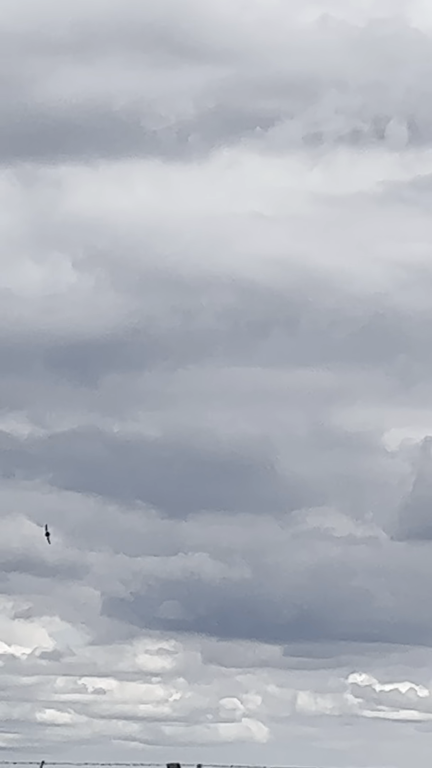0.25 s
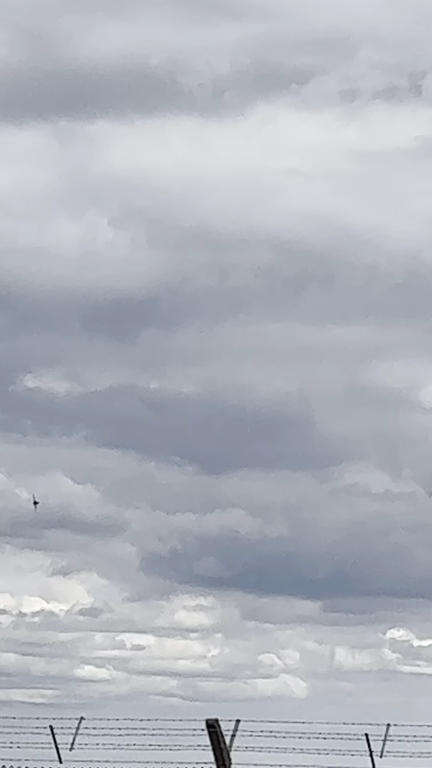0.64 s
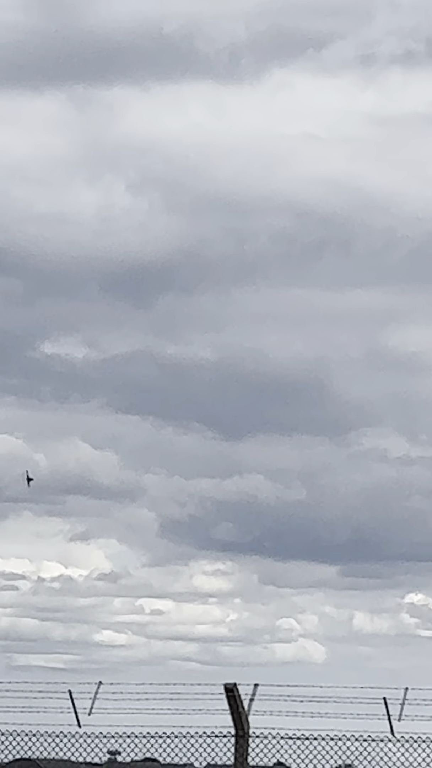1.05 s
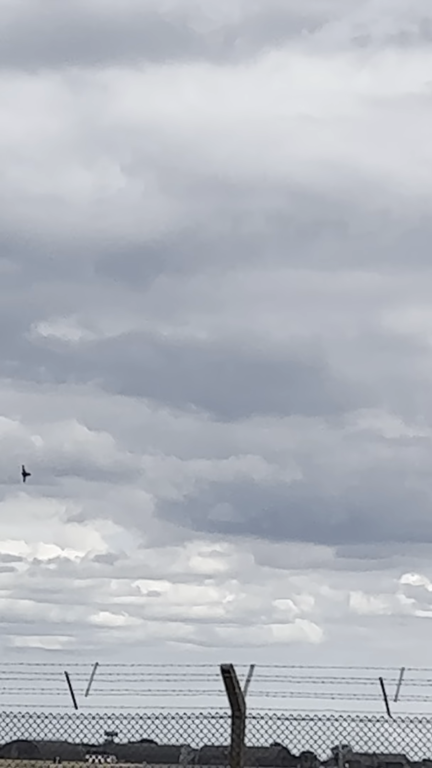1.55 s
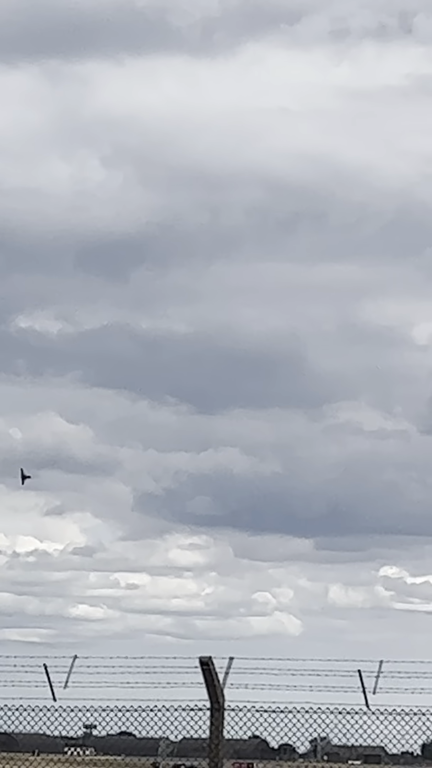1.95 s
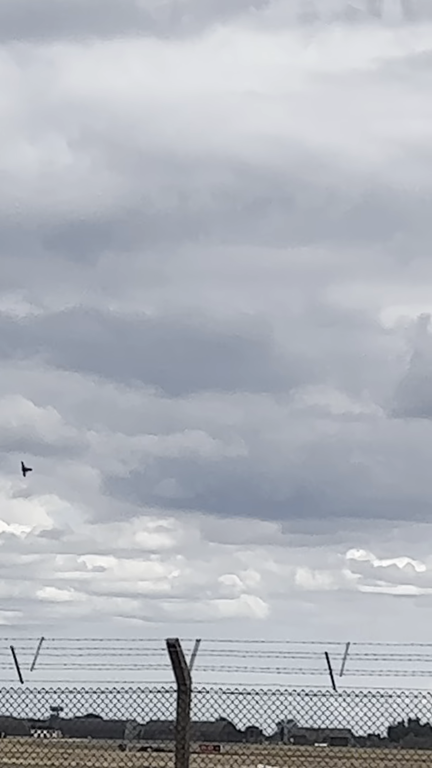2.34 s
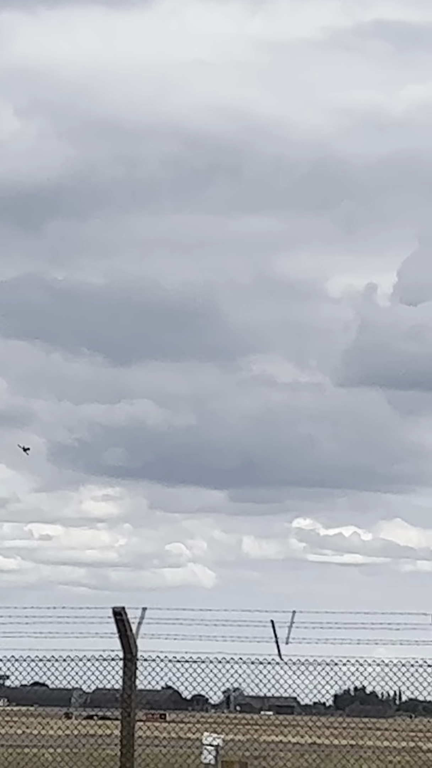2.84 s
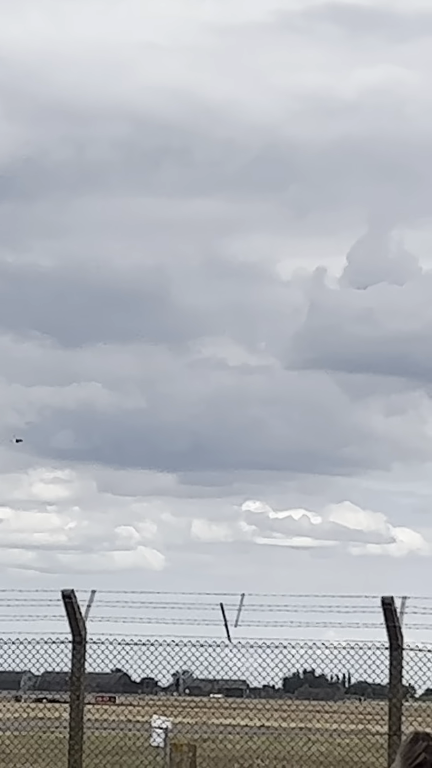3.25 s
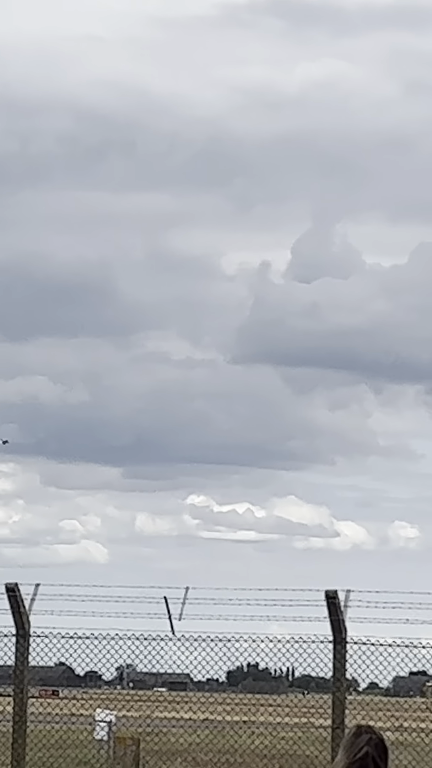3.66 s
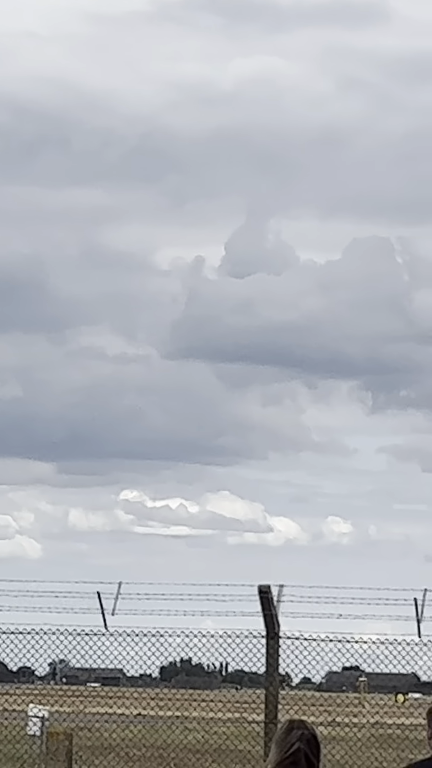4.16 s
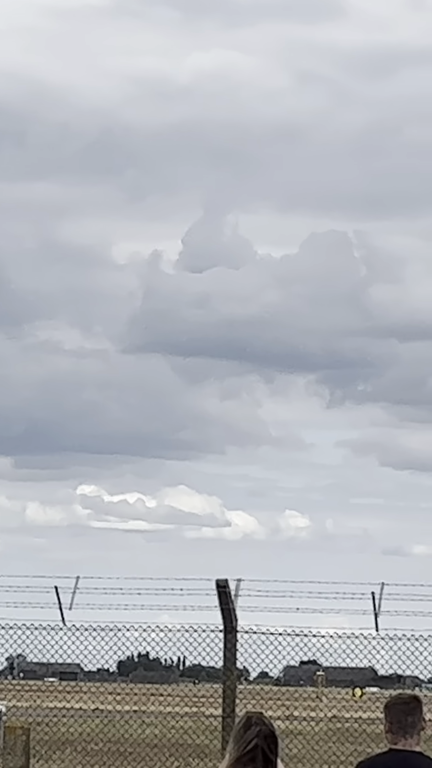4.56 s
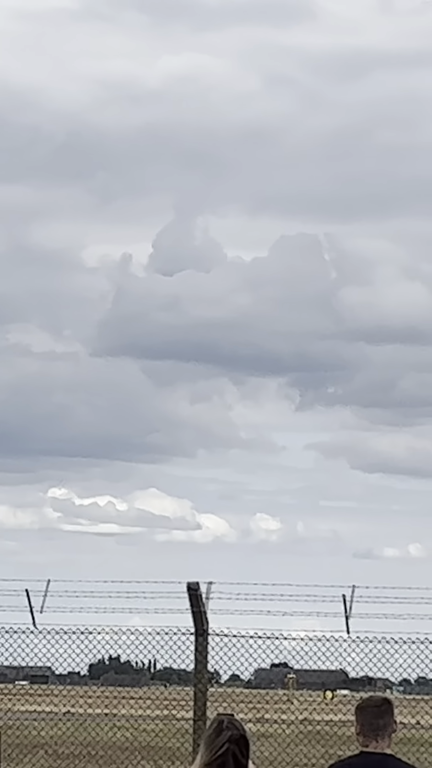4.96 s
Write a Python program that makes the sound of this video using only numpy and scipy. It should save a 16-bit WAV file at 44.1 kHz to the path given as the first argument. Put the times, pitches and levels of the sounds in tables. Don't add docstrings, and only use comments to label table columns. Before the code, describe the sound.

Outdoor hand-held stereo pickup of a receding fighter jet: a deep churning exhaust rumble flickering in tone and loudness, with small crackles near one second and a dense volley of snaps after three. The roar then darkens and sinks into the distance as low rumbling pushes, wind puffs against the microphone and a faint late rustle of grass remain.

```python
import sys
import numpy as np
from scipy import signal
from scipy.fft import rfft, irfft, next_fast_len
from scipy.io import wavfile
from scipy.ndimage import uniform_filter1d, minimum_filter1d

SR = 44100
rng = np.random.default_rng(int(sys.argv[2]) if len(sys.argv) > 2 else 0)


def attenuation_scalar(level_db):
    decades = np.asarray(level_db, float) / 20
    return 10 ** decades


def to_wav(s):
    ch = np.atleast_2d(s).T
    pcm = np.round(np.clip(ch, -1, 1) * 32767)
    wavfile.write(sys.argv[1], SR, pcm.astype(np.int16))


N = 229529
PADDED = next_fast_len(N + SR // 4)
BLOCK = 40


def rms_one(x):
    return x / np.sqrt(np.mean(x ** 2) + 1e-20)


def in_time(rows):
    t_s, *columns = np.transpose(rows)
    return np.array([np.interp(np.arange(N) / SR, t_s, c) for c in columns])


def at_hz(points, column=1):
    hz = np.arange(PADDED // 2 + 1) * SR / PADDED + 1
    table = np.array(points)
    return np.interp(np.log(hz), np.log(table[:, 0]), table[:, column])


def colour(x, spectrum):
    return irfft(rfft(x, PADDED) * attenuation_scalar(at_hz(spectrum)), PADDED)[..., :N]


def impulses(events, gain_db, floor):
    clicks = np.full(N, floor)
    clicks[[round(t_s * SR) for t_s, db in events]] = attenuation_scalar(np.array(events)[:, 1] + gain_db)
    return clicks


def filled(coarse):
    return np.interp(np.arange(N) / BLOCK, np.arange(len(coarse)), coarse)


def drift(rate):
    r = np.exp(-2 * np.pi * BLOCK * rate / SR)
    noise = rng.standard_normal(N // BLOCK + 2002)
    slow = signal.lfilter([1], [1, -2 * r, r * r], noise)[2000:]
    return filled(rms_one(slow))


def bumps(t_s, half_s):
    block_s = np.arange(0, N + BLOCK, BLOCK) / SR
    return np.exp(-((block_s - np.array(t_s)[:, None]) / np.array(half_s)[:, None]) ** 2)


def lifts(rows):
    t_s, half_s, db = np.transpose(rows)
    return filled(db @ bumps(t_s, half_s))


# t/s, level/dB, brightness/(dB/octave)
PASS = [(0.0, 10.5, 1.4), (0.15, 0.5, 2.5), (0.55, 0.4, 2), (1.0, 6.5, 0.4), (1.5, 3, 1), (2.0, -3.5, 0.5),
        (2.4, 1, 0.25), (2.9, 1.5, 0), (3.3, 6, 0.37), (3.55, 4.5, 0), (3.95, -1.6, -2), (4.3, -3.5, -1.03),
        (4.8, -8.5, -1.5), (5.2, -24, 2.5)]
PIVOT_HZ = 300
# t/s, half length/s, f/Hz, lift/dB
WIDE_SWELLS = [(0.042, 0.03, 700, 0), (0.092, 0.081, 65, 4.4), (0.642, 0.023, 2402, 4.3),
               (0.666, 0.029, 119, 5.2), (0.903, 0.1, 303, 9.5), (0.973, 0.017, 2440, 5),
               (1.242, 0.037, 1067, 7), (1.45, 0.027, 87.1, 6.2), (1.452, 0.059, 983, 5.6),
               (1.834, 0.052, 882, 8.3), (2.016, 0.05, 1316, 8.7), (2.06, 0.019, 262, 5),
               (2.434, 0.037, 563, 10), (2.609, 0.085, 769, 13.5), (2.766, 0.021, 1442, 11),
               (2.785, 0.062, 524, 10.4), (3.239, 0.015, 2506, 5.5), (3.461, 0.13, 350, 7.1),
               (3.475, 0.13, 2955, 5.3), (3.877, 0.19, 2930, 4.4), (4.281, 0.026, 600, 3.9),
               (4.638, 0.036, 536, 6.2), (4.988, 0.044, 229, 9.7), (5.144, 0.19, 62, 27)]
# t/s, half length/s, f/Hz, lift/dB
NARROW_SWELLS = [(0.081, 0.58, 2080, 5), (0.114, 0.092, 334.4, 4.4), (0.25, 0.045, 606, 8),
                 (0.413, 0.091, 458, 6), (0.783, 0.037, 543, 6.7), (0.892, 0.21, 2430, 9.3),
                 (1.123, 0.056, 910, 3.7), (1.281, 0.14, 328, 11.2), (1.362, 0.078, 2104, 4),
                 (1.506, 0.053, 390, 9.9), (1.796, 0.42, 1760, 3), (1.914, 0.09, 320.4, 13),
                 (1.958, 0.23, 130, 12), (2.207, 0.037, 1041, 11), (2.571, 0.017, 100.5, 7.7),
                 (2.641, 0.027, 1550, 5.6), (2.643, 0.094, 264, 2.7), (2.747, 0.065, 174.3, 8),
                 (3.0, 0.13, 164, 8.4), (3.013, 0.14, 334.3, 14), (3.255, 0.052, 166, 9),
                 (3.264, 0.047, 297, 15), (3.319, 0.24, 97.6, 7.4), (3.659, 0.035, 132, 7.1)]
# t/s, half length/s, f/Hz, lift/dB
SMALL_SWELLS = [(.91, 0.035, 230, 2.5), (2.3, 0.16, 460, 6), (9.4, .04, 80, 1.5), (3.25, 0.012, 92, 2.5),
                (.975, .02, 1700, -3), (5.5, 0.046, 330, 5.5), (2.5, .06, 81, 5), (2.3, 0.021, 610, 3.5),
                (2.7, 0.036, 300, -1.5), (.55, 0.062, 240, 3), (1.6, 0.02, 930, 0), (0.75, 0.031, 480, 8),
                (1.24, 0.035, 340, 3), (1.8, 0.038, 830, -3), (1.53, .04, 580, 0), (1.4, 0.018, 3300, 3.5),
                (1.8, .015, 290, -9), (2, 0.012, 500, -3.5), (1.5, 0.028, 1500, 1.5), (4.1, .03, 750, -1),
                (5.7, 0.028, 1100, 7.5), (0.63, .06, 290, -3.5), (3.4, 0.034, 170, 1), (3.0, 0.012, 250, 6),
                (3.27, 0.017, 300, 3.5), (4, 0.065, 290, -1), (3.45, .05, 190, -5), (3.5, 0.013, 600, 3),
                (1.9, 0.034, 780, 0), (5.7, .012, 3300, -6), (2.1, 0.018, 250, 10), (3.5, .02, 880, -1),
                (0.054, 0.054, 2200, -0.5), (.025, 0.022, 370, 1.5), (3.48, .03, 4800, 4),
                (3.555, 0.0099, 2600, 0.5), (1.4, .03, 2500, 1.5), (3.44, 0.016, 700, -0.5),
                (3.57, .04, 3600, -0.5), (1.9, .06, 230, -3), (0.017, 0.052, 880, 0), (2.43, 0.017, 1000, -3),
                (3.04, 0.12, 320, 3), (3.3, 0.034, 510, 1.5), (1.83, .03, 1900, 3.5), (0.021, 0.027, 1500, 2),
                (.975, .015, 4000, -0.5), (2.7, .05, 400, -3.5), (1.87, .035, 330, 4.5),
                (2.22, 0.032, 1500, 1),
                (0.235, 0.08, 90, -4), (4.9, .06, 450, 4.5), (5.11, .04, 1150, -5), (3.199, .03, 140, 3.5),
          (1.43, .04, 900, 3), (0.644, 0.037, 509, 4.5), (0.866, 0.072, 640, 3.5),
          (0.912, 0.087, 355, -1.5), (1.079, 0.036, 177.3, -5), (1.125, 0.044, 797, 0.5),
          (1.179, 0.044, 511, -2), (1.367, 0.046, 251, 4), (1.566, 0.04, 722, -6.5),
          (1.971, 0.08, 280.4, 3), (2.01, 0.071, 1430, 1.5), (2.166, 0.099, 178.2, -6.5),
          (2.172, 0.073, 450, -3), (2.551, 0.08, 127.6, -6), (2.682, 0.08, 1425, 2.5),
          (2.915, 0.054, 401, 2), (3.139, 0.041, 284, 6), (3.27, 0.096, 226.4, -1),
          (3.313, 0.078, 124, 2.5), (3.369, 0.08, 1818, 0), (3.447, 0.088, 79.8, -4.5),
          (3.457, 0.04, 1130, 5.5), (3.46, 0.08, 126, 3.5), (3.504, 0.08, 114.5, 1.5),
          (3.527, 0.088, 201.5, -5), (3.553, 0.096, 352, 4.5), (3.576, 0.08, 631, -6),
          (3.733, 0.089, 141.7, 8), (3.892, 0.07, 720, 4), (4.052, 0.08, 254.3, 3.5), (4.088, 0.08, 455, 0),
          (4.239, 0.064, 225.6, 3.5),
                (0.005, 0.05, 336.6, -3), (0.075, 0.05, 860, -2), (0.245, 0.05, 106.5, -1.5),
           (0.305, 0.05, 269.0, -5.5), (0.425, 0.05, 66.2, 6), (0.454, 0.05, 133.7, -6),
           (0.452, 0.05, 270.3, 4), (0.525, 0.05, 67.2, 1.5), (0.635, 0.05, 67.0, -5),
           (0.844, 0.046, 425, -2), (0.944, 0.057, 135.0, -4), (1.145, 0.05, 855.0, 0),
           (1.345, 0.05, 107.0, 5.5), (1.585, 0.05, 429.4, 1.5), (1.685, 0.05, 214.0, -2),
           (1.775, 0.05, 134.7, 1), (2.135, 0.05, 67.0, 6), (2.202, 0.043, 422.5, 6),
           (2.256, 0.05, 107.0, -5.5), (2.425, 0.05, 426, -3.5), (2.435, 0.05, 67.1, -4),
           (2.575, 0.05, 67.0, 6), (2.885, 0.05, 107.1, 1.5), (2.917, 0.046, 339.0, 3.5),
           (3.195, 0.05, 135.0, 5), (3.283, 0.045, 135.0, 3), (3.425, 0.05, 133.2, 5.5),
           (3.513, 0.05, 107.0, 2.5), (3.605, 0.05, 67.2, -5), (3.727, 0.05, 67.1, -7.5),
           (3.815, 0.05, 67.0, -3.5), (3.814, 0.044, 135.0, 4.5), (3.905, 0.05, 214.0, 8.5),
           (3.945, 0.046, 67.6, 3), (4.045, 0.05, 170.3, -5.5), (4.505, 0.05, 269.0, -4.5),
           (4.545, 0.039, 67.0, 8), (5.016, 0.054, 67.0, -5),
                (0.073, 0.038, 793, -1.5), (0.282, 0.039, 156.7, 5), (0.609, 0.035, 157.8, 6),
           (0.738, 0.038, 398, -5.5), (1.082, 0.035, 156.6, -4), (1.135, 0.035, 791, 2.5),
           (1.17, 0.032, 157.5, 5.5), (1.268, 0.038, 157, -4), (1.295, 0.028, 395, -5.4),
           (1.653, 0.035, 627, -3), (1.715, 0.035, 249, -6), (1.948, 0.035, 249.5, 3.5),
           (1.979, 0.032, 1253, 3.3), (2.059, 0.039, 397, 4), (2.157, 0.035, 157, -4),
           (2.168, 0.035, 396, 3.5), (2.288, 0.035, 157.6, -4), (2.294, 0.035, 498, -5.5),
           (2.379, 0.035, 157, -5.5), (2.429, 0.035, 397, -4), (2.646, 0.035, 249.3, 2.5),
           (2.732, 0.032, 156.7, 3), (2.753, 0.035, 794, -3.5), (2.804, 0.035, 314.5, 3.0),
           (2.868, 0.035, 157.2, -3.9), (2.926, 0.035, 395, 4), (3.103, 0.038, 395.5, -4),
           (3.257, 0.032, 197.7, -2.5), (3.345, 0.035, 157, 4), (3.39, 0.035, 314, -3.2),
           (3.716, 0.035, 157, -4), (3.839, 0.035, 157, 4), (4.007, 0.035, 997, -5),
           (4.097, 0.039, 500, -3.5), (4.202, 0.035, 498, -4.5), (4.274, 0.035, 198, 3),
           (4.802, 0.035, 629, -5), (4.881, 0.035, 314, -4), (5.201, 0.029, 157, -8),
           (5.201, 0.035, 788, -5.5)]
WIDE_OCTAVES, NARROW_OCTAVES = 1.42, 0.49


def path_gain():
    level_db, tilt_db = in_time(PASS)
    narrow = NARROW_SWELLS + SMALL_SWELLS
    t_s, half_s, centre_hz, lift_db = np.transpose(WIDE_SWELLS + narrow)
    octaves = np.repeat([WIDE_OCTAVES, NARROW_OCTAVES], [len(WIDE_SWELLS), len(narrow)])
    shapes = bumps(t_s, half_s)

    def at(hz):
        nearness = np.exp(-(np.log2(hz / centre_hz) / octaves) ** 2)
        swell_db = (lift_db * nearness) @ shapes
        gain_db = level_db + tilt_db * np.log2(hz / PIVOT_HZ) + filled(swell_db)
        return gain_db - 10 * np.log10(np.mean(attenuation_scalar(2 * gain_db[::BLOCK])))
    return at


# t/s, rise/dB
SURGES = [
    (.957, 1),
    (1.188, 2),
    (1.342, -1),
    (1.686, 4.5),
    (1.964, 2.5),
    (2.743, 1.5),
    (3.815, 0.5),
    (4.258, -0.5),
    (4.996, -0.5),
]


def surges(fade_s):
    jumps = np.zeros(N)
    jumps[[round(t_s * SR) for t_s, db in SURGES]] = np.array(SURGES)[:, 1]
    return signal.lfilter([1], [1, -np.exp(-1 / (fade_s * SR))], jumps)


# delay/ms, wander/ms, level/dB
BENT_PATHS = [
    (2.8, 0.7, -10),
    (4.6, 1.1, -8.5),
    (7.5, 1.5, -10),
]


def paths(x):
    out, n = x, np.arange(N)
    dull = signal.sosfilt(signal.butter(1, 900, fs=SR, output="sos"), x)
    for delay_ms, wander_ms, echo_db in BENT_PATHS:
        read = n - SR / 1000 * (delay_ms + wander_ms * drift(1.453))
        out = out + attenuation_scalar(echo_db) * np.array([np.interp(read, n, row) for row in dull])
    return out


# f/Hz, level/dB
ROAR_COLOUR = [(13, -54.5), (22, -20.5), (40, -15), (106, 2), (186, -0.5), (257, -1.5), (299, -1.5),
               (347, -0.5), (501, -4.5), (621, -5), (1190, -14), (1440, -19.5), (2470, -29.5), (3800, -51),
               (4940, -78), (8360, -120)]
# t/s,
# half length/s, lift/dB
BURSTS = [(.0, 0.00043, 39), (.04, .02, 4), (.16, .015, 3), (.47, 0.017, 6.5), (.64, 0.025, 3.5),
          (.85, 0.027, 8.5), (.97, 0.02, 6), (1.25, 0.024, 5.5), (1.45, 0.078, 2.5), (2.02, 0.032, 3.5),
          (2.335, 0.022, 5), (2.63, 0.048, 9), (2.76, 0.032, 5.5), (3.1, 0.097, 5.5), (3.24, 0.035, 7.5),
          (3.33, 0.099, 8), (3.47, 0.018, 6.5), (3.52, 0.066, 6.5), (3.6, .045, 4.5), (3.67, 0.021, 6),
          (3.745, .04, 4), (3.86, 0.062, 12), (3.95, 0.036, 9.5), (4.12, .06, 6.5), (4.47, .02, 6.5),
          (4.65, 0.054, 9)]
ROAR_DB = -19
RASP_FROM_HZ, RASP_SHARE_PER_OCTAVE = 2360, 1
MONO_FROM_HZ, OPENS_AT, BURST_OPENS_PER_DB = 1700, 1.6, .05


def roar(shared_db, own_db):
    path_db = path_gain()
    burst_db = lifts(BURSTS[1:])
    sudden_db = surges(fade_s=0.16)
    edges_hz = 20 * 2 ** np.arange(0, 8.6, 1 / 3)
    white = rng.standard_normal((2, 2, N))
    eddies, out = drift(9.2), 0
    for k, (low, high) in enumerate(zip(edges_hz, edges_hz[1:])):
        hz = np.sqrt(low * high)
        own = drift(10.9)
        twinkle_db = shared_db * np.clip(hz / 900, .1, 1) * eddies + own_db * own
        surge_db = np.clip(hz / 500, 0, 1) * sudden_db
        rasp_db = RASP_SHARE_PER_OCTAVE * max(np.log2(hz / RASP_FROM_HZ), 0) * burst_db
        band_pass = signal.butter(2, [low, high], "band", fs=SR, output="sos")
        band = signal.sosfilt(band_pass, white[k % 2])
        if hz > MONO_FROM_HZ:
            width = np.clip(4 * (own + BURST_OPENS_PER_DB * burst_db - OPENS_AT), 0, 1)
            band = band * [np.ones(N), width]
        out = out + attenuation_scalar(path_db(hz) + twinkle_db + surge_db + rasp_db) * band
    return attenuation_scalar(ROAR_DB) * rms_one(paths(colour(out, ROAR_COLOUR)))


# f/Hz, level/dB
CRACKLE_COLOUR = [(1500, -38), (2800, 6.5), (3800, -7), (5000, -16.5), (6500, -28.5), (8200, -41.5),
                  (10000, -65)]
# t/s, peak level/dB
SHOCKS = [(0.1594, -55), (0.9597, -40.5), (0.9717, -54), (.9795, -54), (0.9855, -46.5), (.992, -57),
          (1.2494, -61), (1.4182, -74), (2.334, -67), (2.624, -64), (2.742, -62), (3.2297, -45),
          (3.2595, -45), (3.348, -40.5), (3.386, -44), (3.4113, -49), (3.428, -43.5), (3.4342, -41.5),
          (3.4454, -45), (3.46, -42), (3.4762, -42.5), (3.4972, -56), (3.5183, -47.5), (3.551, -41),
          (3.5895, -54), (3.8195, -49.5), (.4095, -57), (.7682, -57), (1.3214, -59), (1.5025, -62),
          (2.615, -62.5), (2.6618, -58.5), (2.749, -54), (2.7746, -58), (2.799, -59), (3.0789, -58),
          (3.2929, -57), (3.376, -50.5), (3.36, -54.5), (.0475, -49), (.032, -57), (.181, -60), (.643, -56),
          (3.401, -51), (3.465, -48), (3.4696, -48.5), (3.4855, -49), (3.4935, -47.5), (3.504, -48),
          (3.526, -50), (3.537, -54), (3.556, -48), (3.5607, -54), (3.691, -64), (3.8013, -62)]
CRACKLE_DB, CRACKLE_HZ, CRACKLE_FOLLOWS = -68, 3200, 0.61


def crackle(per_s, spread_db, tail_s):
    arrives = rng.random(N) < per_s / SR
    sizes = attenuation_scalar(spread_db * np.minimum(rng.exponential(1, N), 5)) * arrives
    level_db = CRACKLE_DB + CRACKLE_FOLLOWS * path_gain()(CRACKLE_HZ) + lifts(BURSTS)
    dense = attenuation_scalar(level_db) * rms_one(colour(sizes, CRACKLE_COLOUR))
    fronts = impulses(SHOCKS, gain_db=-7.0, floor=0.0)
    decay = signal.lfilter([1], [1, -np.exp(-1 / (tail_s * SR))], fronts + 1e-18)
    tails = 0.68 * rng.standard_normal(N) * decay
    unit = np.zeros(N)
    unit[N // 2] = 1
    high_pass = signal.butter(4, 3800, "high", fs=SR, output="sos")
    top = signal.sosfilt(high_pass, colour(unit, CRACKLE_COLOUR))
    return dense + colour(fronts + tails, CRACKLE_COLOUR) / abs(top).max()


# f/Hz, left minus right/dB, left lead/rad, likeness 0-1
PORTS = [(40, 1.5, 0.1, 0.95), (100, -0.4, 0.23, 0.99), (180, -0.7, -0.72, 1), (300, -1.5, -0.27, 1),
         (450, -3, 0.68, 0.92), (620, -4.5, -0.85, 0.95), (800, -0.5, -0.66, 0.63),
         (1000, -4.5, -1.2, 0.82), (1250, -5, -0.75, 0.83), (1500, -3.9, -0.01, 0.72),
         (1800, -0.5, 0.63, 0.76)]
# f/Hz, left minus right/dB, left lead/rad, likeness 0-1
UPPER_PORTS = [(2030, 0, 0, .94), (3400, 0, 0, .94), (3800, 0, 0, 1), (5100, 0, 0, 1), (5250, 0, 0, .5),
               (7200, 0, 0, .15), (9000, 0, 0, .3)]
# f/Hz, left minus right/dB, left lead/rad, likeness 0-1
TURNED_PORTS = [(40, -3, 0.02, 0.91), (100, -0.3, -0.02, 1), (180, -1.4, -0.07, 0.93),
                (300, -3, -0.21, 0.94), (450, -2.5, -0.4, 0.91), (620, -7.5, -0.09, 0.93),
                (800, -3.5, -0.05, 0.94), (1000, -5.5, -0.28, 0.88), (1250, -7.5, 0.03, 0.87),
                (1500, -1.5, 0.29, 0.92), (1800, 0.5, 0.16, 0.94)]
# t/s, share of swing 0-1
TURN = [
    (0, 0.0),
    (.8, .1),
    (1.5, 0.6),
    (2.1, 0.8),
    (3, .95),
    (5.21, 0.7),
]


def one_pose(direct, scattered, table):
    alike = np.clip(at_hz(table, column=3), 0, 1)
    mid = np.sqrt((1 + alike) / 2) * rfft(direct, PADDED)
    side = np.sqrt((1 - alike) / 2) * rfft(scattered, PADDED)
    shade = attenuation_scalar(at_hz(table) / 2) * np.exp(.5j * at_hz(table, column=2))
    return irfft([(mid + side) * shade, (mid - side) / shade], PADDED)[:, :N]


def ports(direct, scattered):
    swing = np.clip(in_time(TURN), 0, 1)
    before = one_pose(direct, scattered, PORTS + UPPER_PORTS)
    after = one_pose(direct, scattered, TURNED_PORTS + UPPER_PORTS)
    return (1 - swing) * before + swing * after


# t/s, level/dB
GUSTS = [(0, -64), (.85, -57), (1.1, -39), (1.45, -34), (1.62, -33.5), (1.85, -39), (2.2, -43.5),
         (2.45, -51.5), (2.65, -32), (3, -37.5), (3.3, -48), (3.55, -41), (3.85, -61), (4.6, -49),
         (5.21, -40.5)]
# t/s, half length/s, lift/dB
PUFFS = [
    (4.33, 0.064, 18),
    (4.42, .03, 15),
    (4.53, .03, 4),
    (4.86, 0.065, 9.5),
    (5.03, 0.04, 4),
    (5.13, 0.045, 2),
    (5.2, 0.024, -5.5),
]
# f/Hz, level/dB
WIND_COLOUR = [(25, -19), (70, -7), (140, 3), (350, -3), (900, -16), (1550, -22), (2000, -51.5),
               (4000, -110)]


def wind(lumpy_db, alike):
    mid, side = rms_one(colour(rng.standard_normal((2, N)), WIND_COLOUR))
    lumps = attenuation_scalar(in_time(GUSTS)[0] + lifts(PUFFS) + lumpy_db * drift(25))
    return lumps * (alike * mid + side * [[1], [-1]])


# t/s, level/dB
RUSTLE = [
    (.9, -103.5),
    (1.5, -90),
    (1.75, -100),
    (4.2, -104),
    (4.45, -90),
    (4.65, -92),
    (4.88, -87),
    (5.14, -78.5),
    (5.21, -78),
]
# f/Hz, level/dB
RUSTLE_COLOUR = [(2500, -24), (4800, 5.5), (6800, -0.5), (8500, -8), (10000, -25)]


def rustle():
    silence = [(RUSTLE[0][0] - .3, -120)]
    level_db = in_time(silence + RUSTLE)[0] + 1.5 * drift(6)
    return attenuation_scalar(level_db) * rms_one(colour(rng.standard_normal(N), RUSTLE_COLOUR))


# t/s, level/dB
VOLLEY = [(3.2305, -42), (3.461, -36.5), (3.466, -42), (3.4706, -37.5), (3.4754, -31.5), (3.4855, -42),
          (3.490, -40), (3.494, -40.5), (3.4984, -39), (3.504, -41.5), (3.551, -36), (3.5555, -40.5)]
VOLLEY_HZ = (2580, 4430)


def volley():
    clicks = impulses(VOLLEY, gain_db=20.0, floor=1e-18)
    return signal.sosfilt(signal.butter(4, VOLLEY_HZ, "band", fs=SR, output="sos"), clicks)


# t/s, peak level/dB
THUDS = [
    (4.007, -29),
    (4.651, -22.5),
    (4.789, -23),
    (4.856, -20),
    (4.969, -20.5),
    (5.107, -29),
    (5.167, -22),
]


def thuds(hz, t60):
    pushes = impulses(THUDS, gain_db=-3.5, floor=1e-18)
    soft = signal.sosfilt(signal.butter(2, 220, fs=SR, output="sos"), pushes)
    r, w = attenuation_scalar(-60 / (t60 * SR)), 2 * np.pi * hz / SR
    return signal.lfilter([0, np.sin(w)], [1, -2 * r * np.cos(w), r * r], soft)


def scene():
    direct, scattered = roar(shared_db=1.0, own_db=1.41)
    treble = crackle(per_s=5200, spread_db=2.5, tail_s=0.0011) + rustle() + volley()
    trailing = colour(np.roll(treble, 41), [(4500, -40), (5200, 0)])
    ahead = direct + treble + thuds(hz=70, t60=0.15)
    return ports(ahead, scattered + trailing) + wind(lumpy_db=4.5, alike=0.72)


def top_cut(x):
    return signal.sosfilt(signal.butter(12, 10320, fs=SR, output="sos"), x)


def record(dry):
    x = signal.sosfilt(signal.butter(4, 42, "high", fs=SR, output="sos"), dry)
    allowed = np.minimum(1, .85 / (abs(x).max(axis=0) + 1e-9))
    held = minimum_filter1d(allowed, size=601)
    x = x * uniform_filter1d(uniform_filter1d(held, size=300), size=300)
    bass = signal.sosfilt(signal.butter(2, 420, fs=SR, output="sos"), x)
    clock_hz = 9600
    image = attenuation_scalar(-62.5) * bass * np.cos(2 * np.pi * clock_hz * np.arange(N) / SR)
    hiss = attenuation_scalar(-101) * rng.standard_normal((2, N))
    return top_cut(x + image + hiss)


dry = scene()
out = record(dry)
to_wav(out)
```